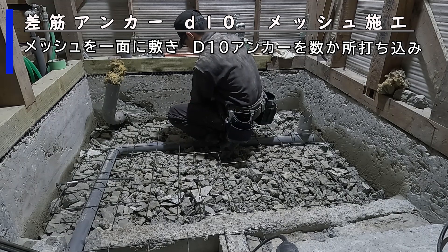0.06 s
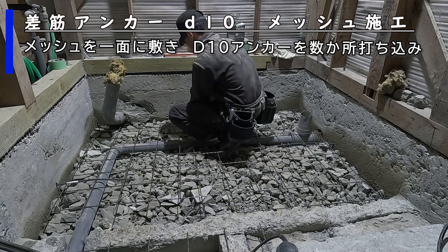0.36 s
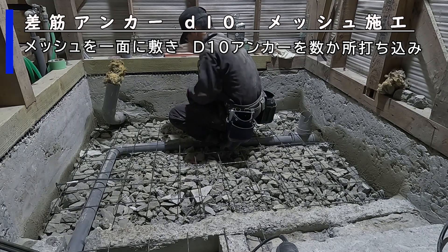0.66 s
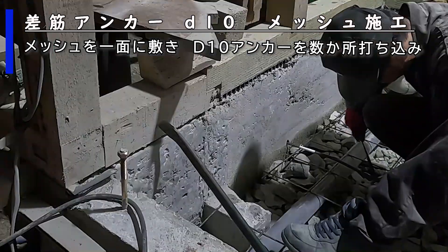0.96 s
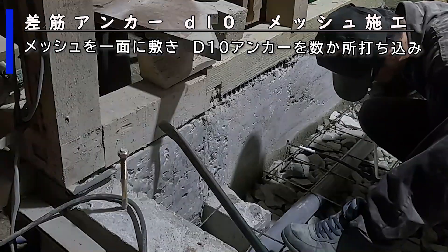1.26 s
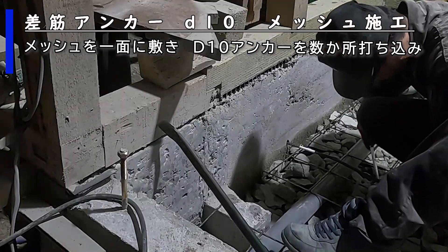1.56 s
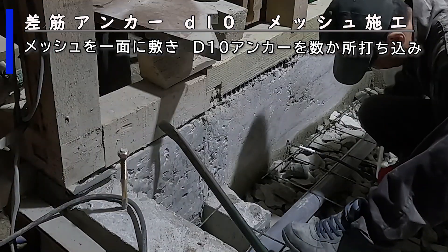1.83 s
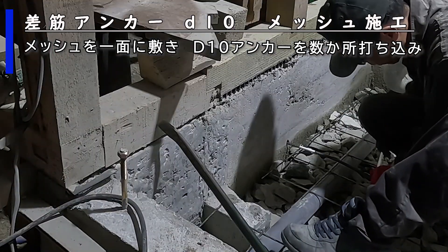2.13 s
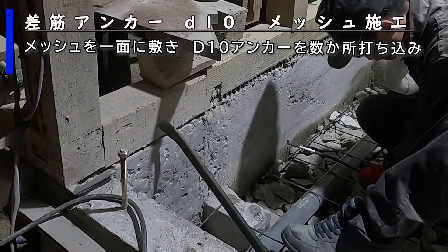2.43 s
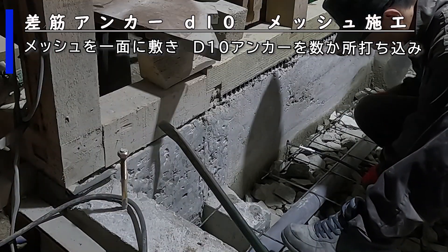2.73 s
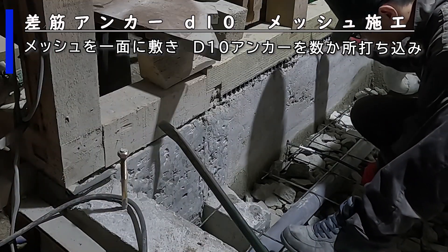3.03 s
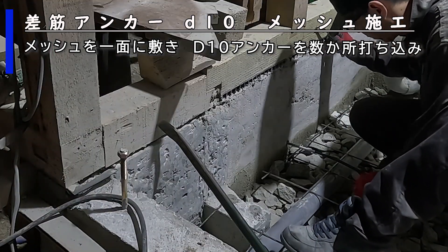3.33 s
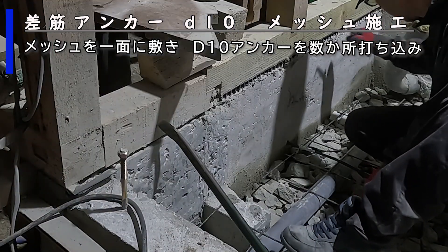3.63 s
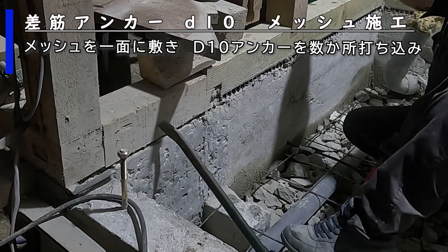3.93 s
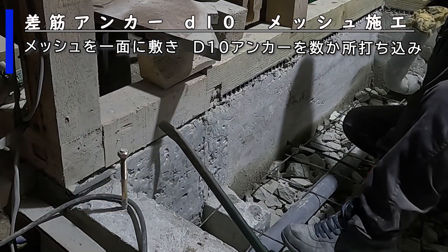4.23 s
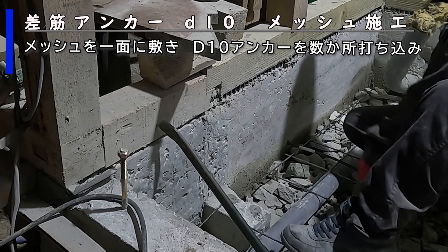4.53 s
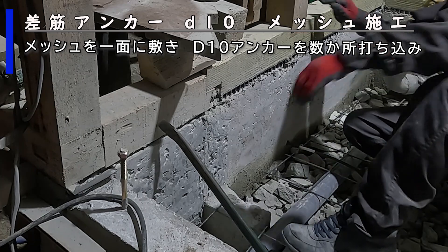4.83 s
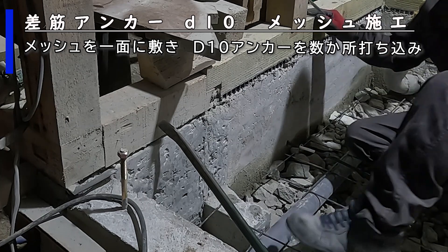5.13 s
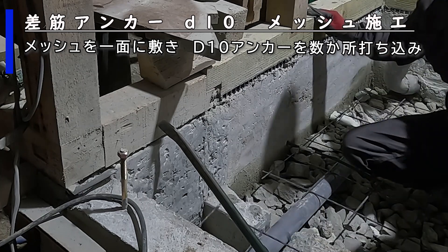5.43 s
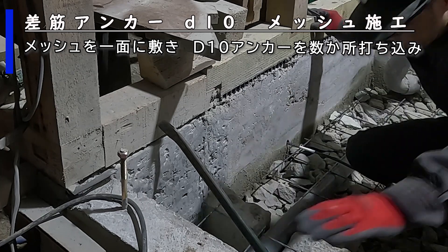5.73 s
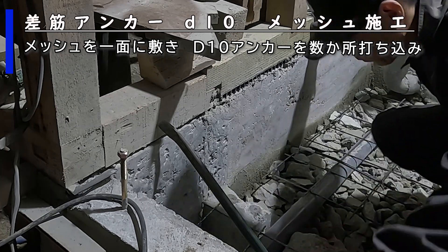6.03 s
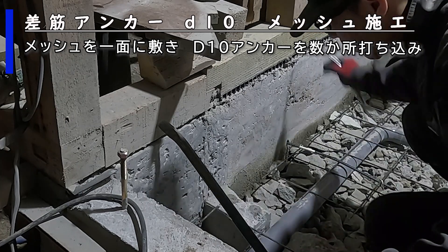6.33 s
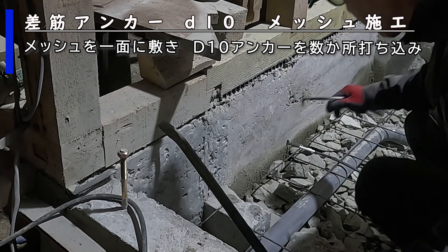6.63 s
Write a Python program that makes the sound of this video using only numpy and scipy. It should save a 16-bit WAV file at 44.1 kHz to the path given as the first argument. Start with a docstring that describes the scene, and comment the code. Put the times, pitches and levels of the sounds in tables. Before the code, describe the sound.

Someone shifts on rattling steel mesh, a small tool clinks and stones knock underfoot, then a steel bar scrapes.

```python
"""Welded steel mesh clashes and rings as a worker crouches on it, over crushed stone in a concrete footing.
Its bars chatter together, then the whole grid rings on. A small steel tool clinks, stones knock under
his boots and his clothes rustle. At the end a bar sticks and slips along the steel, so it judders.
One small microphone hears it all, with faint outdoor noise; its hollow housing adds a honk to the blows."""
import sys
import numpy as np
from scipy import signal
from scipy.fft import rfft, irfft, next_fast_len
from scipy.io import wavfile

SR = 44100
rng = np.random.default_rng(int(sys.argv[2]) if len(sys.argv) > 2 else 0)


def master(y):
    """Save y as 16-bit WAV."""
    cut = np.clip(np.atleast_2d(y).T, -1, 1)
    pcm = np.round(cut * 32767)  # scale
    wavfile.write(sys.argv[1], SR, pcm.astype(np.int16))


N = 294147
TIME = np.arange(N) / SR
RING_N = 65536   # samples in one ringing sound
RING_T = np.arange(RING_N) / SR
SCENE_CHANGE_S = 0.928   # the scene changes here, and all earlier ringing stops short

# mesh clashes: (time [s], strength [dB], treble slope [dB/octave], bass [dB], ring [dB], rebounds [count])
CLASHES = [(0.0, -16, -5.5, -16.5, -4, 0), (0.013, -17.5, -2, -23.5, -3.5, 3),
           (0.143, -22, -4.5, -23, 0, 0), (0.299, -20.5, -8.5, -22, -6.5, 1),
           (0.633, -25.5, -3.5, -24, 18, 0), (0.656, -18, -5, -24.5, -3.5, 3), (0.823, -24, -7, -34, 14, 0),
           (0.88, -17.5, -1, -19.5, 0, 0), (1.147, -38.5, -7.5, -11.5, -1, 0),
           (1.662, -27.5, -3.5, -26.5, 10, 1), (1.804, -28.5, -2, -24, -14, 0),
           (2.173, -22, -4.5, -15, -6.5, 0), (2.229, -22.5, -2.5, -15, -12.5, 1),
           (2.314, -17, -1.5, -12.5, -7, 0), (5.525, -19, -3, -19.5, -28, 1),
           (5.776, -17.5, -5.5, -27, -12, 1)]
# borders of a blow's four pitch zones, low, middle, high and top: (frequency [Hz])
ZONE_EDGES_HZ = [200, 1100, 2200, 5500, 14000]
# tone colour of struck steel: (frequency [Hz], level [dB])
MESH_COLOUR = [(50, -38), (130, -19), (190, -10), (300, 6), (650, -3.5), (950, -2.5), (1300, -1), (1720, 5),
               (2250, -0.5), (3200, 4.5), (4500, -3.5), (8000, -9.5), (11000, -15), (16000, -24)]
# tone colour of struck stone: (frequency [Hz], level [dB])
STONE_COLOUR = [(50, -31), (140, -25.5), (280, -10.5), (550, 3), (900, 5.5), (1600, 6.5), (2400, -0.5),
                (4500, 6), (8000, -0.5), (11000, -11), (16000, -22.5)]


def mesh(note_spacing_hz=17, graze_s=0.0068):
    """Bars chatter against each other for a moment, then the whole grid bends to and fro and rings on."""
    # the grid's clearest notes: (frequency [Hz], level [dB], fade time [s])
    mesh_notes = [(303, -17, 1.3), (320, -24.5, 2.2), (1206, -9, 0.57), (1330, -14.5, 1.27),
                  (1607, -4, 0.31), (2930, -10, 0.75), (3120, -15, 0.67), (3744, -13.5, 0.68),
                  (5400, -12, 0.13), (7010, -21, 0.73), (7110, -17, 0.78), (8440, -19.5, 0.65)]
    # how long its many other notes last: (frequency [Hz], fade time [s])
    mesh_fades = [(250, 0.77), (700, 0.99), (1600, 0.64), (3200, 0.44), (6500, 0.28), (14000, 0.15)]
    out = np.zeros(N)
    present = rng.random(RING_N // 2 + 1) < SR / RING_N / note_spacing_hz
    for s, strength_db, slope_db, bass_db, ring_db in mesh_blows():
        zone_db = zone_levels(strength_db, slope_db, bass_db)
        chatter = from_db(-4) * grains(per_s=3900, spread_db=4.5, size=RING_N) * fade(0.17)
        hit_piece = from_db(-3) * short_ring(spacing_hz=180, fade_s=0.052)
        grid_ring = from_db(ring_db) * dense_ring(present, mesh_fades)
        grid = coloured(chatter + hit_piece + grid_ring, MESH_COLOUR)
        bars = from_db(ring_db - 8) * struck(mesh_notes, uneven_db=1.5)
        add(out, s, from_db(-1) * balanced(housing(grid + bars), zone_db, first_s=0.0051))
        add(out, s, crack(strength_db + 2, zone_db, MESH_COLOUR, fade_s=0.0097))
        # the bars graze each other just before they meet
        add(out, s - graze_s, crack(strength_db - 1, zone_db, MESH_COLOUR, fade_s=0.095))
    return out


def mesh_blows(gap_s=0.028, total_drop_db=3, dulling_db_per_octave=2.5):
    """The mesh springs back at an even pace after a clash, each rebound weaker and duller than the last."""
    for s, strength_db, slope_db, bass_db, ring_db, rebounds in CLASHES:
        for k in range(rebounds + 1):
            blow_db = strength_db - total_drop_db * k / max(rebounds, 1)
            yield s + k * gap_s, blow_db, slope_db - dulling_db_per_octave * k, bass_db, ring_db


def dragged_bar(chatter_from_s=6.577, chatter_gap_s=0.011):
    """A bar sticks and slips: each slip is a burst of tiny contacts that sets it ringing."""
    # steady rubbing between slips: (time [s], friction [dB])
    drag = [(6.37, -72), (6.385, -20), (6.415, -16.5), (6.53, -22), (6.6, -16.5), (6.67, -20.5)]
    # the bar catches and jolts free: (time [s], level [dB])
    slips = [(6.4188, -0.5), (6.4397, -6.5), (6.4602, -1), (6.4875, -6), (6.4958, -3), (6.507, -7),
             (6.5314, -7), (6.5443, -13.5), (6.569, -8)]
    # the bar's broad resonances: (frequency [Hz], width [Hz], level [dB])
    bar_body = [(356, 50, -16.5), (1020, 67, -24.5), (1194, 76, -15), (1534, 233, 4), (2100, 120, -13),
                (2596, 267, -6), (3840, 270, -6.5), (4490, 670, -4), (6080, 820, -13), (7600, 440, -20.5),
                (10030, 1130, -20)]
    # its clear tones: (frequency [Hz], level [dB])
    bar_tones = [(936.7, -41), (1540, -23), (1631, -26), (2040, -35.5), (2449, -33.5), (2740, -29),
                 (3375, -42.5), (3741, -36), (4317, -30.5), (4436, -32), (4813, -30), (5663, -35),
                 (6045, -55), (6110, -42), (6923, -38.5), (7278, -51), (7773, -33.5)]
    sliding = TIME > drag[0][0] + 0.008
    force = from_db(over_time(drag)) * sliding
    for s, db in slips:
        add(force, s, from_db(db + 3) * fade(0.032))
    # in the end the jolts merge into a chatter of small slips
    for k, (jitter, uneven) in enumerate(rng.uniform(-1.1, 1, size=(24, 2))):
        s = chatter_from_s + chatter_gap_s * (k + 0.37 * jitter)
        if s < TIME[-1]:
            add(force, s, from_db(-5 + 3 * uneven) * fade(0.029))
    contacts = force * rng.choice([-1, 1], N)
    body = sum((-1) ** k * from_db(db) * resonance(contacts, hz, width_hz)
               for k, (hz, width_hz, db) in enumerate(bar_body))
    tones = sum(from_db(db + 28) * resonance(contacts, hz, width_hz=28) for hz, db in bar_tones)
    grit = from_db(-22) * housing(coloured(contacts, STONE_COLOUR))
    ringing = from_db(6) * (body + tones + grit)
    # rough steel hisses on stone for as long as it slides
    bright_noise = resonance(rng.standard_normal(N), hz=7200, width_hz=6500)
    hiss = from_db(-33) * sliding * unit_level(resonance(bright_noise, hz=8900, width_hz=6500))
    # (frequency [Hz], level [dB])
    colour = [(60, -11.5), (300, -4.5), (700, 2), (1300, 3.5), (10500, -1.5), (13500, -5), (15500, 0.5)]
    return coloured(ringing + hiss, colour)


def tool():
    """A small steel tool lands with a bright tick and rings briefly; a glancing touch barely ticks."""
    # its landings: (time [s], level [dB], tick compared with that level [dB])
    clinks = [(0.0164, -11.5, 0.5), (0.3252, -28, -14), (1.6633, -15.5, -10), (2.461, -26, -10),
              (2.5706, -44, -7), (3.1542, -42.5, -14), (3.899, -22.5, -18), (5.1277, -18, -1.5)]
    # its notes: (frequency [Hz], level [dB], fade time [s])
    tool_notes = [(6200, -15, 0.07), (7230, -17.5, .18), (7770, -4, 0.054), (7770, -8.5, 0.13),
                  (7810, -3.5, 0.052), (8450, -21, 0.13), (12300, -31, .06)]
    out = taps([row[:2] for row in clinks], tool_notes, gain_db=-5)
    for s, db, tick_db in clinks:
        zone_db = zone_levels(db, slope_db=3.5, bass_db=-12)
        add(out, s, crack(db + tick_db, zone_db, MESH_COLOUR, fade_s=0.025))
    return out


def loose_bar():
    """One loose bar clanks with a few notes of its own."""
    # its clanks: (time [s], level [dB])
    clanks = [(0.6589, -12.5), (2.3135, -15.5), (5.526, -18.5), (5.7775, -13), (5.8074, -19.5)]
    # its notes: (frequency [Hz], level [dB], fade time [s])
    bar_notes = [(918, -13, 0.45), (1480, -4, 0.58), (2544, 4.5, 0.091), (2596, 4, 0.15), (2640, -11, 0.22)]
    return taps(clanks, bar_notes, gain_db=-9)


def wire_end():
    """A springy end of wire gives a short, very high ping."""
    # its pings: (time [s], level [dB])
    pings = [(1.804, -36), (2.266, -23.5)]
    # its notes: (frequency [Hz], level [dB], fade time [s])
    wire_notes = [(10800, -0.5, 0.055), (12100, -25, .08)]
    return taps(pings, wire_notes, gain_db=-4.5)


def pinned_bar():
    """A dusty pebble taps a pinned bar softly, so the bar rings briefly without a click."""
    # the pebble's taps: (time [s], level [dB])
    pebble_taps = [(1.149, -26.5), (3.081, -35), (4.249, -19), (4.942, -27)]
    # the bar's notes: (frequency [Hz], level [dB], fade time [s])
    bar_notes = [(1640, -6.5, 0.17), (1970, -7.5, .04)]
    return resonance(taps(pebble_taps, bar_notes, gain_db=1), hz=1750, width_hz=900)


def stones():
    """Stones tip and knock with a crunch and a clack; the concrete walls answer."""
    # the knocks: (time [s], strength [dB], treble slope [dB/octave], bass [dB])
    knocks = [(1.475, -36, -6.5, -2), (3.153, -33, -10, 11.5), (4.248, -18, -20, -12), (5.24, -26, -3, -4),
              (5.331, -22.5, -23, -17), (5.369, -20, -8, -4), (5.388, -23.5, -11, -15),
              (5.581, -18.5, -4.5, -8), (5.928, -19.5, -6, -4.5), (6.026, -29, -1.5, 6),
              (6.092, -13, -8.5, -14), (6.272, -26.5, -5.5, -15), (6.311, -27, -7, -6.5),
              (6.377, -18, -2, -4)]
    # how long sound lingers between the walls: (frequency [Hz], fade time [s])
    wall_fades = [(250, 0.99), (800, 0.56), (2500, 0.1), (6500, 0.44), (14000, 0.15)]
    out = np.zeros(N)
    for s, strength_db, slope_db, bass_db in knocks:
        zone_db = zone_levels(strength_db, slope_db, bass_db)
        fade_s = 0.21 * 2 ** (strength_db / 26.5)   # harder knocks crunch for longer
        crunch = grains(per_s=2700, spread_db=4.5, size=RING_N) * fade(fade_s)
        clack = from_db(2) * short_ring(spacing_hz=290.5, fade_s=fade_s)
        walls = from_db(-10) * dense_ring(1, wall_fades)
        knock = housing(coloured(crunch + clack + walls, STONE_COLOUR))
        add(out, s, from_db(-6) * balanced(knock, zone_db, first_s=0.006))
        add(out, s, crack(strength_db - 4, zone_db, STONE_COLOUR, fade_s=0.0047))
        # the stone rocks back and settles with a smaller click
        settle_s = s + 0.031 * rng.uniform(0.31, 1.3)
        add(out, settle_s, crack(strength_db - 9, zone_db, STONE_COLOUR, fade_s=0.012))
    return out


def drain_pipe():
    """A boot bumps a hollow pipe; the rubber sole is soft, so the note swells instead of clicking."""
    # the bumps: (time [s], level [dB])
    bumps = [(5.347, -31), (5.357, -25.5), (5.381, -26)]
    # the pipe's notes: (frequency [Hz], level [dB], fade time [s])
    pipe_notes = [(566.4, 0, 0.13), (680, -6, 0.062)]
    return resonance(taps(bumps, pipe_notes, gain_db=-0.5), hz=556, width_hz=220)


def movement(far_db=-37, wander_db=2.5, wanders_per_s=30):
    """How much is moving, in dB: the worker shifts in fits and starts, and each clash stirs the grit."""
    # his effort while crouching: (time [s], level [dB])
    crouching = [(0.95, -52), (1.7, -60.5), (1.83, -52.5), (2.21, -41.5), (2.34, -51), (2.69, -73),
                 (3.07, -53), (3.21, -50.5), (3.98, -47.5), (4.5, -65)]
    # his effort while stepping across: (time [s], level [dB])
    stepping = [(4.55, -56.5), (4.63, -45.5), (4.792, -42), (5.276, -44), (5.718, -36.5), (5.986, -40),
                (6.218, -39.5), (6.36, -42)]
    effort = from_db(np.where(TIME < SCENE_CHANGE_S, far_db, over_time(np.vstack([crouching, stepping]))))
    stirred_power = np.zeros(N)
    for s, strength_db, *_ in CLASHES:
        add(stirred_power, s, (from_db(strength_db - 14) * fade(1.0)) ** 2)
    wander = np.interp(TIME * wanders_per_s, np.arange(1000), rng.standard_normal(1000))
    return 10 * np.log10(effort ** 2 + stirred_power) + wander_db * wander


def gravel(movement_db):
    """Grit grinds and pebbles tick, louder when there is more movement."""
    # tone colour of gravel: (frequency [Hz], level [dB])
    colour = [(60, -14), (150, -13.5), (260, 5), (420, 0.5), (850, 3.5), (1600, 6), (2400, 0.5),
              (4000, 1.5), (10000, -47)]
    grinding = unit_level(housing(coloured(grains(per_s=3000, spread_db=0, size=N), colour)))
    ticks = unit_level(housing(coloured(grains(per_s=45, spread_db=4.5, size=N), colour)))
    return from_db(movement_db) * (from_db(-1) * grinding + from_db(-10) * ticks)


def clothes(movement_db):
    """Work clothes rub more as he moves more, and now and then a sleeve or trouser leg sweeps past."""
    # the sweeps: (middle time [s], half length [s], level [dB])
    swishes = [(0.986, 0.018, -51), (4.72, 0.013, -54), (4.87, 0.056, -52.5), (5.037, 0.0083, -49)]
    # tone colour of cloth: (frequency [Hz], level [dB])
    colour = [(300, -11), (1600, -12.5), (2600, 1), (3800, -8), (6000, -3.5), (10000, -11.5),
              (12500, -18.5), (16000, -21)]
    rustle = unit_level(housing(coloured(grains(per_s=13000, spread_db=3.5, size=N), colour)))
    return (from_db(movement_db - 12) + swells(swishes)) * rustle


def boot_scuffs():
    """A sole slides over the stones, making many tiny contacts."""
    # the scuffs: (middle time [s], half length [s], level [dB])
    scuffs = [(3.19, 0.089, -46.5), (3.56, 0.022, -49), (5.59, 0.052, -29), (6.05, 0.048, -33.5)]
    # (frequency [Hz], level [dB])
    colour = [(120, -20), (300, -10.5), (600, 1), (950, 5.5), (1600, 3.5), (2600, -8), (9000, -30.5)]
    return swells(scuffs) * unit_level(coloured(grains(per_s=1700, spread_db=4, size=N), colour))


def outdoor_air(level_db=-57):
    """Distant outdoor noise makes a faint, steady rush."""
    # its tone colour: (frequency [Hz], level [dB])
    colour = [(12, -63.5), (20, -12), (158, -20), (301, -7), (446, -13.5), (1120, -7), (1610, -10),
              (2140, -12.5), (8180, -27.5), (10800, -36), (13500, -57), (14700, -40), (16000, -55)]
    return from_db(level_db) * unit_level(coloured(rng.standard_normal(N), colour))


def housing(x):
    """The hollow in front of the microphone adds a honk and a narrow ring, and cuts a treble band."""
    honk = from_db(8) * resonance(x, hz=1520, width_hz=300)
    ring = from_db(11) * resonance(x, hz=1655, width_hz=130)
    boosted = x + honk + ring
    return boosted - resonance(boosted, hz=13550, width_hz=2200)


def crack(peak_db, zone_db, colour, fade_s):
    """The first hard contact of a blow is a short burst of noise in that blow's tone colour."""
    burst = (rng.standard_normal(RING_N) * fade(fade_s))[:RING_N // 16]
    x = balanced(housing(coloured(burst, colour)), zone_db, first_s=0.016)
    return from_db(peak_db) * x / np.abs(x).max()


def taps(events, notes, gain_db):
    """Single touches set a small object ringing."""
    out = np.zeros(N)
    for s, db in events:
        add(out, s, from_db(db + gain_db) * struck(notes, uneven_db=2.5))
    return out


def struck(notes, uneven_db):
    """A struck object rings with fading pure tones; each blow shares its energy among them differently."""
    out = np.zeros(RING_N)
    for hz, db, fade_s in notes:
        gain = from_db(db - uneven_db * rng.normal()) * rng.choice([-1, 1])
        out += gain * np.sin(2 * np.pi * hz * RING_T) * fade(fade_s)
    return out


def short_ring(spacing_hz, fade_s, lowest_hz=1150):
    """The piece that is hit is small and stiff, so it rings briefly with high notes of its own."""
    hz = np.fft.rfftfreq(RING_N, 1 / SR)
    present = (rng.random(len(hz)) < SR / RING_N / spacing_hz) & (hz > lowest_hz)
    phases = np.exp(2j * np.pi * rng.random(len(hz)))
    return unit_level(irfft(present * phases)) * fade(fade_s)


def dense_ring(present, fades):
    """Many close notes of random strength fade band by band; present picks which sound (1 for all)."""
    hz = np.fft.rfftfreq(RING_N, 1 / SR)
    notes = present * (rng.standard_normal(len(hz)) + 1j * rng.standard_normal(len(hz)))
    notes = notes / np.std(irfft(notes))
    centres_hz, fade_times = np.transpose(fades)
    bands = [at_hz(np.c_[centres_hz, share], hz) for share in np.eye(len(fades))]
    return sum(irfft(notes * band) * fade(fade_s) for band, fade_s in zip(bands, fade_times))


def grains(per_s, spread_db, size):
    """Tiny contacts come at random moments; spread_db makes their strengths uneven."""
    strength = from_db(spread_db * np.minimum(rng.exponential(1, size), 4))
    touching = rng.random(size) < per_s / SR
    return unit_level(touching * strength * rng.choice([-1, 1], size))


def zone_levels(strength_db, slope_db, bass_db):
    """A blow's four zone levels: its strength in the middle, shifted by bass below and slope above."""
    octaves = np.log2(np.multiply(ZONE_EDGES_HZ[:-1], ZONE_EDGES_HZ[1:])) / 2
    return strength_db + np.r_[bass_db, slope_db * (octaves[1:] - octaves[1])]


def balanced(x, zone_db, first_s):
    """Where and how hard a blow lands sets how loudly it starts in each pitch zone."""
    start = x[:int(first_s * SR)]
    power_per_hz = 2 * np.abs(rfft(start, SR)) ** 2 / (SR * len(start))
    gains = [(np.sqrt(low * high), db - 10 * np.log10(power_per_hz[low:high].sum()))
             for low, high, db in zip(ZONE_EDGES_HZ, ZONE_EDGES_HZ[1:], zone_db)]
    return coloured(x, gains)


def coloured(x, colour):
    """Give x a tone colour with a minimum-phase filter, a kind that lets nothing sound early."""
    size = next_fast_len(len(x) + 4096, real=True)
    gains = from_db(at_hz(colour, np.fft.rfftfreq(size, 1 / SR)))
    cepstrum = irfft(np.log(gains), size)
    response = np.exp(rfft(2 * cepstrum[:size // 2], size) - cepstrum[0])
    return irfft(rfft(x, size) * response, size)[:len(x)]


def resonance(x, hz, width_hz):
    """Let through the band around hz and weaken the rest."""
    r = np.exp(-np.pi * width_hz / SR)
    feedback = [1, -2 * r * np.cos(2 * np.pi * hz / SR), r * r]
    return signal.lfilter(np.array([1, 0, -1]) * (1 - r * r) / 2, feedback, x + 1e-18)


def fade(fade_s):
    """A gain that falls by 60 dB in the fade time."""
    return np.exp(-np.minimum(np.log(1000) * RING_T / fade_s, 40))


def swells(events):
    """Gains that rise and fall smoothly around their middle times."""
    return sum(from_db(db) * np.exp(-((TIME - s) / half_s) ** 2) for s, half_s, db in events)


def add(track, s, sound):
    """Mix a sound in at time s; one that starts before SCENE_CHANGE_S stops there."""
    start = max(int(s * SR), 0)
    end = int(SCENE_CHANGE_S * SR) if s < SCENE_CHANGE_S else N
    part = sound[:end - start]
    track[start:start + len(part)] += part


def over_time(points):
    """Join (time, value) points with straight lines."""
    return np.interp(TIME, *np.transpose(points))


def at_hz(points, hz):
    """Read between (frequency, value) points, with octaves evenly spaced."""
    known_hz, values = np.transpose(points)
    return np.interp(np.log(np.maximum(hz, 1)), np.log(known_hz), values)


def from_db(db):
    """Turn decibels into a gain."""
    return 10 ** (np.asarray(db) / 20)


def unit_level(x):
    """Scale x to an average (rms) level of 1."""
    return x / np.sqrt(np.mean(x ** 2) + 1e-20)


def scene():
    """All sources meet at one microphone, the same in both channels."""
    air = outdoor_air()
    steel = mesh() + dragged_bar() + tool() + loose_bar() + wire_end() + pinned_bar()
    knocking = drain_pipe() + stones()
    movement_db = movement()
    shuffling = gravel(movement_db) + clothes(movement_db) + boot_scuffs()
    bass_cut = signal.butter(2, 130, "high", fs=SR, output="sos")
    nearby = signal.sosfilt(bass_cut, steel + knocking + shuffling)
    return np.tile(nearby + air, (2, 1))


def record(dry):
    """The highest peaks are rounded off, and treble above 16000 Hz is cut."""
    rounded = dry / (1 + (dry / .95) ** 4) ** .25
    return signal.sosfilt(signal.ellip(10, .1, 80, 16000, fs=SR, output="sos"), rounded)


dry = scene()
out = record(dry)
master(out)
```